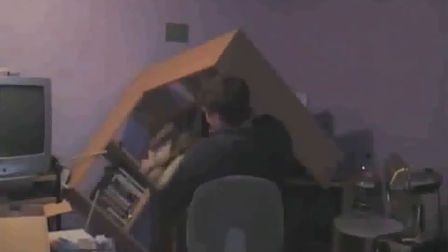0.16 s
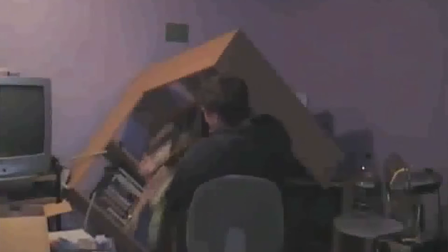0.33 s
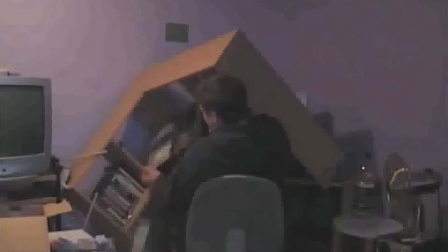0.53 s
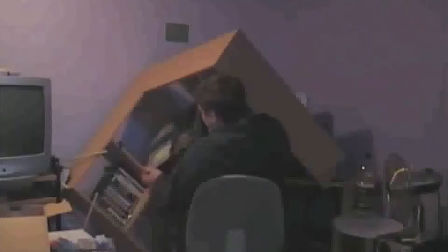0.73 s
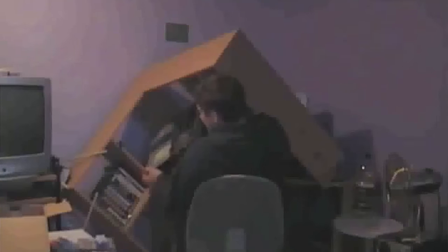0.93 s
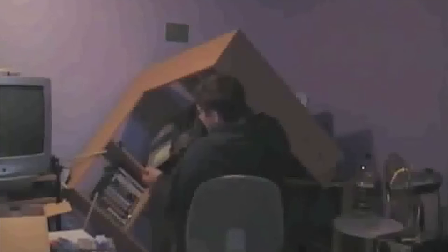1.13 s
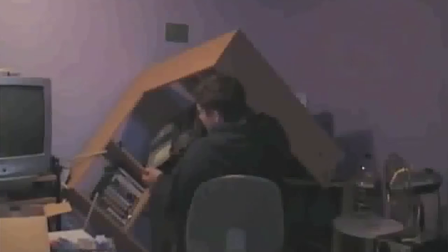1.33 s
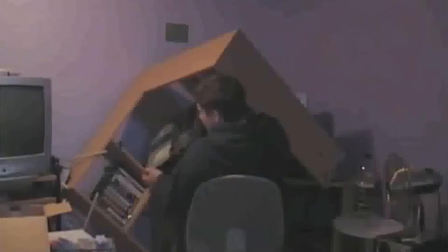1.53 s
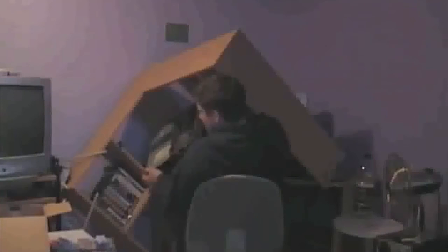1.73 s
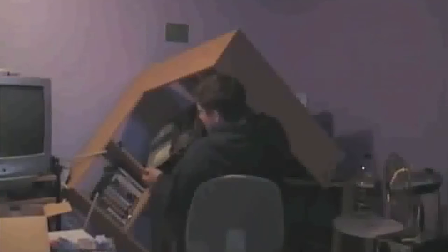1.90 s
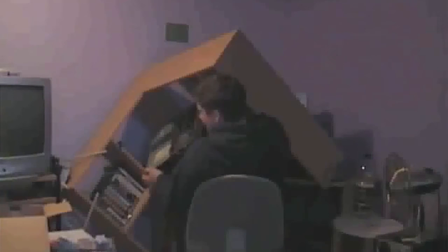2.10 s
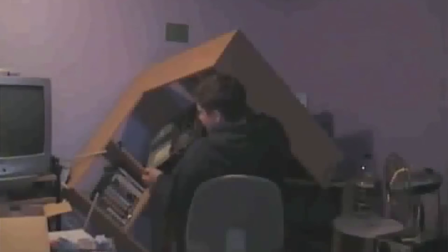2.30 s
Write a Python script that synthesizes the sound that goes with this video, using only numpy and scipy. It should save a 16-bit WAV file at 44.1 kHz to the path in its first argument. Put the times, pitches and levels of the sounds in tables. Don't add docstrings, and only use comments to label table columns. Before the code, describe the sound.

Wooden furniture crash in a small room, with clattering cases, floor thuds and a late scrape

```python
import sys
import numpy as np
from scipy import signal
from scipy.fft import rfft, irfft, next_fast_len
from scipy.io import wavfile
from scipy.ndimage import uniform_filter1d

SR = 44100
rng = np.random.default_rng(int(sys.argv[2]) if len(sys.argv) > 2 else 0)


def gain_from_db(level_db):
    decades = np.asarray(level_db, float) / 20
    return 10 ** decades


def master_out(mix):
    frames = np.transpose(np.atleast_2d(mix))
    ceiling = np.clip(frames, -1, 1)
    pcm = np.round(ceiling * 32767).astype(np.int16)
    wavfile.write(sys.argv[1], SR, pcm)


N = 108133
T = np.arange(N) / SR
BLOW_SAMPLES = SR // 5
CASE_RISE_S = 0.005


def colour(x, points, scale=0.96):
    hz, db = np.array(points, float).T
    size = next_fast_len(x.shape[-1])
    f = np.fft.rfftfreq(size, 1 / SR) + 1
    gain_db = np.interp(np.log(f), np.log(hz), db, -90, -90)
    return irfft(rfft(x, size) * gain_from_db(scale * gain_db), size)[..., :x.shape[-1]]


def butter(x, order, hz, kind="low"):
    return signal.sosfilt(signal.butter(order, hz, kind, fs=SR, output="sos"), x)


def unit(x):
    return x / np.sqrt(np.mean(x ** 2))


def curve(rows, axis=1):
    table = np.array(rows)
    return np.interp(T, table[:, 0], table[:, axis])


def wobble(db, samples):
    return gain_from_db(db * unit(uniform_filter1d(rng.standard_normal(N), size=samples)))


def ring(x, hz, t60):
    pole = np.exp(2j * np.pi * hz / SR - np.log(1000) / (t60 * SR))
    level = np.sqrt(4 * (1 - abs(pole)))
    return signal.lfilter([1], [1, -pole], x).imag * level


def grit(size):
    strength_db = 2.5 * np.minimum(rng.exponential(size=size), 4)
    return unit(rng.standard_normal(size) * gain_from_db(strength_db))


def contact(length, rise, size):
    t = np.arange(size) / SR
    return (1 - np.exp(-t / rise)) * np.exp(-t / length)


def add(out, s, x):
    i = max(int(s * SR), 0)
    out[:, i:i + x.shape[1]] += x[:, :N - i]


def heard(x, close_db=0):
    t60_low_s, t60_high_s, split_hz, gap_s = 0.26, 0.19, 5900, 0.0013
    mid_wet_db, side_wet_db = -3, -2.5
    t = np.arange(SR // 3) / SR
    noise = rfft(rng.standard_normal((2, len(t))) * gain_from_db(-60 * t / t60_low_s))
    even = irfft(noise / np.sqrt(uniform_filter1d(np.abs(noise) ** 2, size=15)), len(t))
    low = butter(even, 2, split_hz)
    high = (even - low) * gain_from_db(-60 * t / t60_high_s + 60 * t / t60_low_s)
    tail = (low + high) * (1 - np.exp(-t / gap_s))
    tail = tail * np.cos(np.pi / 2 * t / t[-1]) ** 2
    wet = signal.fftconvolve(x[None], tail, axes=1)
    wet = wet * gain_from_db(np.array([[mid_wet_db], [side_wet_db]]) + close_db)
    direct = np.pad(x, (0, len(t) - 1)) * np.array([[1], [0]])
    return wet + direct


def boards(x):
    return butter(x, 4, 170, "high")


# pitch in Hz, level in dB, time to fall 60 dB in seconds.
WOOD = [(216.5, -13, 0.034), (263.7, 1, 0.27), (348, 0, 0.09), (400, -3, 0.086), (444, 6.5, 0.023),
        (562, 4, 0.036), (648.7, 0.5, 0.031), (694.7, -0.5, 0.17), (804, 3.5, 0.022), (939, 2, 0.03),
        (1077, 0, 0.093), (1258, -5, 0.016), (1349, 5.5, 0.17), (1690, -12, 0.054)]


def wood(force, hz, octaves):
    shift = 1 + 0.02 * min(2 * octaves, 1) * rng.standard_normal(len(WOOD))
    out = 0
    for k, (f, db, t60) in enumerate(WOOD):
        distance = np.log2(f / hz) / octaves
        out = out + (-1) ** k * gain_from_db(db - 4.2 * distance ** 2) * ring(force, f * shift[k], t60)
    return out


# pitch in Hz, level in dB per Hz.
ROOM = [(18, -57), (30, -3.5), (151, 2), (314, -11), (356, -31), (394, 4), (590, -7), (6650, -14.5),
        (12500, -22.5), (16200, -78), (22000, -120)]
# pitch in Hz, width in Hz, level in dB.
FAN = [(78, 7.9, -77.5), (309, 84, -60.5), (400, 90, -75.5), (938, 34, -73), (1570, 40, -84),
       (3285, 55, -77), (4400, 81, -84)]
# time in seconds, gain in dB.
GAIN = [
    (0, 5),
    (1.3, -3),
    (1.45, -3),
    (2.0, 1.5),
    (2.45, 4.5),
]


def room_tone():
    air = gain_from_db(-61.5) * unit(colour(rng.standard_normal((2, N)), ROOM))
    air = air * wobble(0.8, 4000)
    fan = sum(gain_from_db(db) * ring(rng.standard_normal((2, N)), hz, 4.5 / width) for hz, width, db in FAN)
    return butter(air + fan, 8, 11000) * gain_from_db(curve(GAIN))


# time in seconds, level in dB.
SCRAPE = [
    (2.0, -71.5),
    (2.25, -67.5),
    (2.3, -60),
    (2.35, -58),
    (2.40, -48.5),
    (2.45, -43),
]
# pitch in Hz, level in dB per Hz.
SCRAPE_COLOUR = [(100, -16.5), (290, -1), (590, -10), (1270, -9.5), (1900, -34), (3000, -33.5), (3700, -41),
                 (9000, -32)]
# pitch in Hz, width in Hz, level in dB.
SCRAPE_RINGS = [(2980, 87, -16), (5220, 90, -13.5), (1080, 200, -11.5)]


def scrape():
    rub = unit(colour(grit((2, N)), SCRAPE_COLOUR))
    stir = gain_from_db(-2.5) * unit(boards(wood(grit((2, N)), 550, 0.69)))
    squeaks = sum(gain_from_db(db) * ring(grit((2, N)), hz, 2 / width) for hz, width, db in SCRAPE_RINGS)
    return (rub + stir + squeaks) * gain_from_db(curve(SCRAPE))


# middle in seconds, length in seconds, depth in dB.
HISS_DIPS = [
    (2.312, 0.016, -17),
    (2.36, 0.014, -12),
]


def thin(x):
    top = signal.sosfiltfilt(signal.butter(4, 7600, "high", fs=SR, output="sos"), x)
    dip_db = sum(db * np.exp(-((T - s) / length) ** 2) for s, length, db in HISS_DIPS)
    return x - top * (1 - gain_from_db(dip_db))


# pitch in Hz, level in dB per Hz.
CASES = [(530, -20.5), (900, -4), (1020, -1.5), (1120, -1), (2150, -5), (7790, -13.5), (10500, -20),
         (14000, -36.5)]
# time in seconds, level in dB, share of wood in dB.
SLIDE = [(0, -34, 8), (.1, -32, 2.5), (.22, -31, -3.5), (.33, -31.5, -2), (.41, -35, 3.5), (.5, -47, 11.5),
         (.76, -42.5, -23), (.84, -31.5, 2.5), (.93, -52.5, 14), (1.1, -54.5, 3.5), (1.25, -76, 16)]


def slide():
    flutter = wobble(1.2, 600)
    hiss = unit(colour(grit((2, N)), CASES))
    stir = unit(boards(wood(grit((2, N)), 690, 0.87)))
    level = gain_from_db(curve(SLIDE)) * (T < SLIDE[-1][0])
    return level * flutter * (hiss + gain_from_db(curve(SLIDE, axis=2)) * stir)


# start in seconds, level in dB.
THUDS = [
    (.0, -40.5),
    (0.1, -37),
    (0.158, -44),
    (0.269, -36),
    (0.331, -37.5),
    (0.673, -32),
    (.795, -32.5),
    (0.881, -39),
    (1.018, -47.5),
    (1.131, -44.5),
]
# pitch in Hz, level in dB, time to fall 60 dB in seconds.
THUD_MODES = [(53.4, -4, 0.14), (76, -3, 0.26), (180, 4, 0.053)]


def thuds():
    out = np.zeros((2, N))
    for s, db in THUDS:
        x = 0
        for hz, mode_db, t60 in THUD_MODES:
            force = grit(BLOW_SAMPLES) * contact(0.019, 0.0012, BLOW_SAMPLES)
            x = x + gain_from_db(mode_db) * ring(force, hz, t60)
        x = heard(x)
        add(out, s, x / np.abs(x[0]).max() * gain_from_db(db + 1))
    return out


# start in seconds, level
# in dB, pitch in Hz.
CASE_RINGS = [
    (.063, -27.5, 2900),
    (.160, -28, 3600),
    (0.417, -27.5, 8020),
    (0.993, -38.5, 1160),
    (1.123, -43.5, 2800),
]


def case_rings():
    out = np.zeros((2, N))
    for s, db, hz in CASE_RINGS:
        note = unit(ring(grit(BLOW_SAMPLES), hz, 0.0077))
        x = note * contact(0.021, CASE_RISE_S, BLOW_SAMPLES)
        add(out, s, heard(x) * gain_from_db(db + 3))
    return out


# start in seconds, level in dB, brightness in dB per octave, contact length in seconds.
CLATTER = [(0.0024, -17, 2, 0.0045), (0.0464, -21.5, -1.5, 0.048), (0.0618, -20.5, -2, 0.034),
           (0.118, -25, 3.5, 0.065), (0.158, -16.5, 6, 0.016), (0.1694, -25.5, 3, 0.037),
           (0.2508, -14, 0.3, 0.011), (0.2725, -19, 4, 0.029), (0.2832, -5, 3.5, 0.0066),
           (0.292, -18.5, -0.5, 0.041), (0.363, -17, -3, 0.0078), (0.414, -14.5, 1.6, 0.03),
           (0.581, -32, 0.5, 0.092), (0.625, -15.5, 6.5, 0.012), (0.6386, -18.5, 3, 0.037),
           (0.6784, -10.5, -1.7, 0.021), (0.7917, -14, -1.5, 0.014), (0.809, -15.5, -0.2, 0.012),
           (0.8322, -27.5, -2, 0.046), (0.8652, -24, -2.8, 0.036), (0.905, -23, -3.5, 0.0073),
           (1.021, -35, -0.2, 0.017), (1.097, -41.5, -4.5, 0.06), (1.1207, -31.5, -2, 0.023),
           (1.1562, -43, -4.5, 0.06), (1.237, -48, -21, 0.015)]


def clatter():
    out = np.zeros((2, N))
    for s, db, tilt_db, length in CLATTER:
        tilt = [(1, 0), (1000, -2 * tilt_db), (16000, 2 * tilt_db), (22051, 0)]
        rattle = unit(colour(colour(grit(BLOW_SAMPLES), CASES), tilt))
        x = rattle * contact(length, CASE_RISE_S, BLOW_SAMPLES)
        add(out, s - 0.003, heard(boards(x)) * gain_from_db(db - 4.5))
    return out


# start in seconds, level in dB, centre pitch in Hz.
CRACKS = [(.0648, -17, 2630), (.1605, -13.5, 5000), (0.258, -17, 2050), (0.2813, -17, 2930),
          (.289, -13.5, 4500), (.295, -17.5, 1740), (.4175, -15, 2030), (0.421, -18, 6000),
          (.624, -21.5, 6700), (.632, -17.5, 5900), (0.6738, -14, 1530), (0.686, -21.5, 1880),
          (0.7964, -27, 2500), (0.8039, -11, 1770), (2.002, -60, 2300), (2.041, -53, 2150),
          (2.155, -53, 1590), (2.282, -51, 1900)]


def cracks():
    out, size = np.zeros((2, N)), SR // 20
    for s, db, hz in CRACKS:
        force = grit(size) * contact(0.001, 0.0002, size)
        x = ring(force, hz, 0.003)
        add(out, s, heard(boards(x / np.abs(x).max())) * gain_from_db(db))
    return out


# start in seconds, level in dB, pitch in Hz, time to fall 60 dB in seconds.
TAPS = [(.002, -16, 440, 0.019), (.021, -26, 620, 0.02), (.051, -18.5, 563, 0.088),
        (.059, -15.5, 693, 0.068), (.064, -13, 547, .15), (.073, -18, 715, 0.071),
        (0.086, -23.5, 400, 0.058), (.105, -18, 710, 0.015), (.131, -21.5, 680, 0.033),
        (.168, -21.5, 384.5, 0.063), (.222, -24, 640, 0.18), (.246, -22, 638, .04),
        (0.251, -26.5, 278, 0.12), (.288, -15.5, 613, 0.039), (.303, -17.5, 640, 0.037),
        (.306, -28, 218, 0.038), (0.356, -28.5, 385, 0.059), (.361, -28, 860, 0.05),
        (.417, -13.5, 740, 0.05), (.426, -12, 702, 0.015), (.438, -14.5, 610, 0.018),
        (.674, -16, 253, 0.039), (0.678, -20.5, 338, 0.077), (.686, -9, 557, 0.029),
        (.697, -10, 657, 0.026), (.708, -12, 590, 0.025), (.718, -18.5, 400, 0.052),
        (1.016, -33.5, 308, 0.13), (1.025, -33, 622, 0.084), (1.03, -34.5, 667, 0.14),
        (1.121, -37.5, 942, 0.1), (1.13, -47.5, 680, .12), (.593, -22, 687, 0.12), (.634, -24, 687, .2),
        (.862, -21.5, 773, 0.11), (.806, -25, 998, 0.068), (.692, -26.5, 231, 0.056)]


def taps():
    out = np.zeros((2, N))
    for s, db, hz, t60 in TAPS:
        push = contact(t60 / np.log(1000), 0.0022, BLOW_SAMPLES)
        note = np.sin(2 * np.pi * hz * T[:BLOW_SAMPLES]) * push
        add(out, s, heard(note / np.abs(note).max(), close_db=-7) * gain_from_db(db))
    return out


# start in seconds, level in dB, body pitch in Hz, spread in octaves, contact length in seconds.
KNOCKS = [(.003, -21, 540, 0.19, 0.0037), (0.029, -18, 590, 0.36, 0.0065), (0.045, -12.5, 564, 0.41, 0.028),
          (.064, -13.5, 610, 0.45, 0.01), (0.076, -11.5, 574, 0.33, 0.007), (0.104, -15, 700, 0.44, 0.0055),
          (.130, -27.5, 500, 0.41, 0.0034), (0.163, -16, 400, 0.53, 0.0071), (0.205, -20, 547, 0.49, 0.024),
          (0.243, -24.5, 590, 0.3, 0.011), (0.286, -17, 640, 0.35, .012), (0.356, -27.5, 800, 0.51, 0.0095),
          (.414, -11.5, 710, 0.28, 0.0087), (0.582, -22.5, 700, 0.27, 0.016), (0.623, -22, 706, 0.2, 0.029),
          (0.669, -21, 263, 0.74, 0.005), (0.675, -8.5, 447, 0.62, 0.0087),
          (0.692, -16.5, 620, 0.7, 0.0011), (.710, -19.5, 423, 0.16, 0.02),
          (0.795, -19.5, 1010, 0.8, 0.0059), (0.853, -21.5, 760, .3, 0.014),
          (0.888, -20.5, 495, 0.65, 0.0063), (1.008, -28.5, 593, 0.33, 0.024),
          (1.119, -32.5, 800, 1.8, 0.062)]


def knocks():
    out = np.zeros((2, N))
    for s, db, hz, octaves, length in KNOCKS:
        force = grit(BLOW_SAMPLES) * contact(length, 0.00073, BLOW_SAMPLES)
        x = heard(boards(wood(force, hz, octaves)))
        add(out, s, x / np.abs(x[0]).max() * gain_from_db(db + 0.5))
    return out


# pitch in Hz, level of side against mid in dB.
SIDE_DB = [(60, -7), (500, -11), (2000, -9.5), (4000, -3.5), (8000, -1.5), (12000, -2)]
# pitch in Hz, level of left over right in dB.
LEAN_DB = [(60, -0.5), (200, -2), (500, -2), (1000, -0.5), (8000, -0.5)]


def scene():
    background = thin(scrape() + room_tone())
    small_things = slide() + case_rings() + clatter()
    blows = thuds() + cracks() + taps() + knocks()
    mid, side = background + small_things + blows
    side = colour(side, [(0.68, -25)] + SIDE_DB + [(22051, 0.015)])
    lean = [(0.76, 0.0037)] + LEAN_DB + [(22051, -1.5)]
    left = colour(mid + side, lean, scale=1 / 2)
    right = colour(mid - side, lean, scale=-1 / 2)
    return np.array([left, right])


def patchy(x, size):
    width_hz, samples = 500, 3072
    f = np.fft.rfftfreq(size, 1 / SR)
    out = irfft(x, size)[:, :N]
    for hz in 10200 + width_hz * np.arange(8):
        held = np.repeat(rng.standard_normal((2, N // samples + 1)), samples, axis=1)[:, :N]
        gain = uniform_filter1d(gain_from_db(12 * np.minimum(held - 0.5, 0.5)), samples // 4)
        band = irfft(x * ((f >= hz) & (f < hz + width_hz)), size)[:, :N]
        out = out + (gain - 1) * band
    return out


def band_limit(x):
    return signal.sosfilt(signal.butter(12, 14210, fs=SR, output="sos"), x)


def record(dry):
    copy_lag_s, copy_share = 1 / 149.8, 0.42
    whine_hz, whine_db, ceiling = 6640, -72.5, 1.5
    size = next_fast_len(N + SR // 10)
    f = np.fft.rfftfreq(size, 1 / SR)
    late_copy = copy_share * np.exp(-2j * np.pi * f * copy_lag_s)
    x = patchy(rfft(dry, size) * (1 - late_copy), size)
    whine = wobble(1.8, 500) * np.sin(2 * np.pi * whine_hz * T)
    x = x + gain_from_db(whine_db + curve(GAIN)) * whine
    x = butter(x, 3, 45, "high")
    return band_limit(ceiling * np.tanh(x / ceiling))


dry = scene()
out = record(dry)
master_out(out)
```